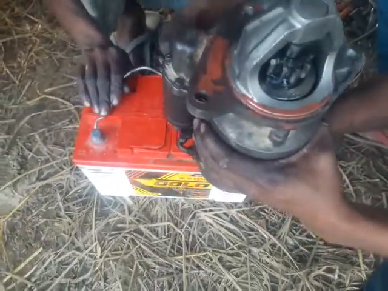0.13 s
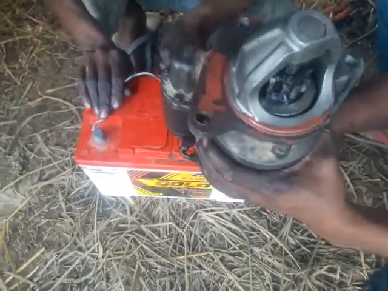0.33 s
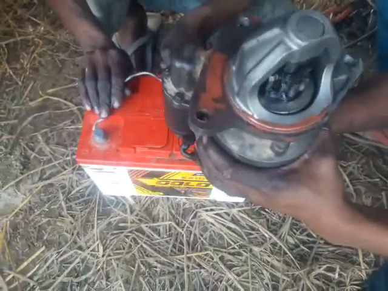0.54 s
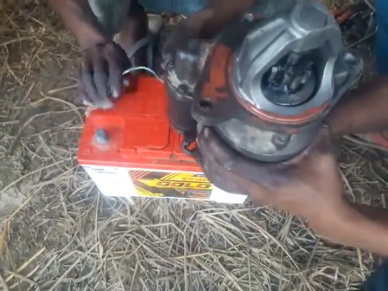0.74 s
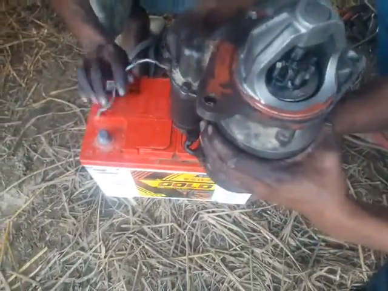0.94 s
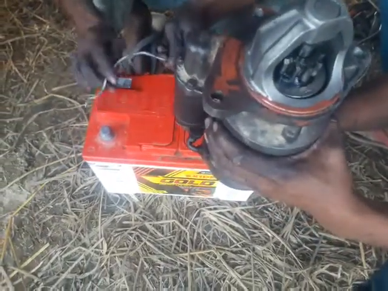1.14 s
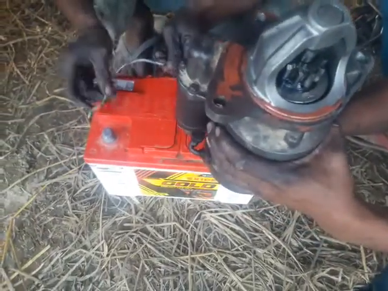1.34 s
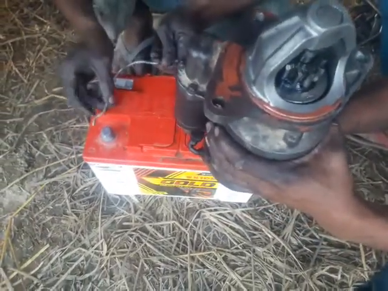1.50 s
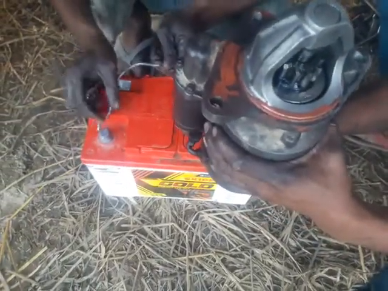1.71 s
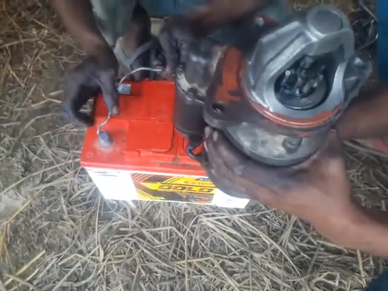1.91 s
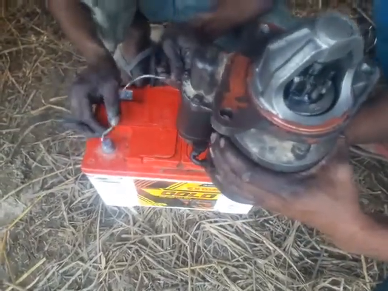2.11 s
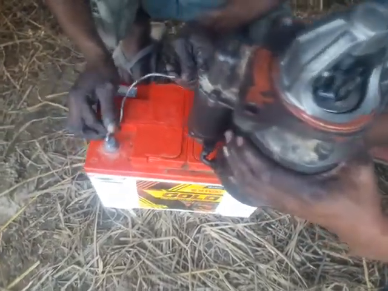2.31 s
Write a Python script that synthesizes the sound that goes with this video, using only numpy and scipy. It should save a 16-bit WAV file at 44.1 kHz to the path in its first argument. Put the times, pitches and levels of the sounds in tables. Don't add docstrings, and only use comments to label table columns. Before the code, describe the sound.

Starter motor solenoid clanks in with sharp electric spark snaps, then drops out in a quiet yard

```python
import sys
import numpy as np
from scipy import signal
from scipy.fft import rfft, irfft
from scipy.io import wavfile
from scipy.ndimage import uniform_filter1d

SR = 44100
rng = np.random.default_rng(int(sys.argv[2]) if len(sys.argv) > 2 else 0)


def to_linear_factor(level_db):
    exponent = np.asarray(level_db, float) / 20
    return 10 ** exponent


def waveform_to_disk(signal):
    frames = np.transpose(np.atleast_2d(signal))
    scaled = np.clip(frames, -1, 1) * 32767
    samples = np.round(scaled).astype(np.int16)
    wavfile.write(sys.argv[1], SR, samples)


N = 103635

# start_s [s], peak_db [dB], treble_db [dB], fizz_db [dB]
SPARKS = [
    (0.2858, -10, -16, -17),
    (0.2998, -16.5, -11, -14),
    (0.343, -6.5, -11, -14),
    (0.595, -21.5, -15.5, -15),
]
# pitch_hz [Hz], width_hz [Hz], level_db [dB]
SPARK_BODY = [(1800, 800, -9), (2350, 600, 0)]
# pitch_hz [Hz], width_hz [Hz], level_db [dB]
SPARK_EDGE = [(6600, 1400, 9.5), (11144, 2400, 8), (14000, 1300, 7.5)]
# pitch_hz [Hz], density_db [dB per Hz]
FIZZ = [(180, -41), (300, -22), (767, -12.5), (2210, 2.5), (4000, -13.5), (8020, -21), (14200, -5.5),
        (16500, -17.5)]
# pitch_hz [Hz], density_db [dB per Hz]
SECOND_ARC = [(9000, -22.5), (14500, 0), (16500, -8)]
# pitch_hz [Hz], density_db [dB per Hz]
SPARK_ECHO = [(700, -19.5), (2200, -0.5), (4000, -11.5), (8000, -18), (14000, -7.5), (16500, -17.5)]

# start_s [s], ring_db [dB], treble_db [dB], crack_db [dB], crack_t60_s [s]
PULL_IN = [
    (.2218, -36, -15, -45, 0.011),
    (.2231, -14.5, -8, -17, 0.025),
    (.227, -23, -3, -21, .05),
    (.2288, -36, 14, -25, .11),
]
# start_s [s], ring_db [dB], treble_db [dB], crack_db [dB], crack_t60_s [s]
DROP_OUT = [
    (.6135, -38, -30, -60, .03),
    (.6172, -36, -30, -55, .02),
    (0.6202, -21, 7, -21, 0.012),
    (.6215, -38, 6, -30, 0.04),
]
# pitch_hz [Hz], level_db [dB], t60_s [s]
CASE_MODES = [(400, -14, .03), (800, -8, .04), (1610, -9, .035), (2000, -12, .04), (2310, -8, .06),
              (3820, -13, .07), (4500, -19, .06), (5950, -21, .05), (7200, -16, .02), (9232, -14, .04),
              (11100, -11, .035), (13300, -11, .03)]
# pitch_hz [Hz], level_db [dB], t60_s [s]
PLUNGER_MODES = [(690, -11, .04), (1250, -12, .03), (1620, -10, .03), (1990, -13, .03), (2300, -13, .03),
                 (6550, -20, .01), (9300, -22, .03), (14900, -7, .012)]
# pitch_hz [Hz], level_db [dB], t60_s [s]
SPRING_MODES = [(1650, -2, .025), (2400, -12, .03), (6550, 0, .028), (9300, -18, .02), (14500, -10, .015)]
# pitch_hz [Hz], density_db [dB per Hz]
CRACK_IN = [(120, -45), (200, -18), (1420, -12), (2250, -1.5), (3310, -16), (7500, -20.5), (14000, -17),
            (16500, -29)]
# pitch_hz [Hz], density_db [dB per Hz]
CRACK_OUT = [(120, -33), (200, 17.5), (1500, -0.5), (4500, -0.5), (6680, 7), (8330, -11.5), (15300, 1.5),
             (16500, -4)]
HOUSING_HZ, SHELL_HZ = 528, 2191
# start_s [s], pitch_hz [Hz], level_db [dB], t60_s [s]
HUMS = [
    (.2231, HOUSING_HZ, -23, 0.17),
    (.2231, 1130, -15, 0.025),
    (.2231, SHELL_HZ, -22.5, 0.15),
    (.6165, HOUSING_HZ, -28.5, 0.093),
]

# start_s [s], peak_db [dB], pitch_hz [Hz], treble_db [dB]
TICKS = [(.402, -42.5, 1510, -35.5), (0.7082, -45, 2030, 2), (0.71, -45, 2240, -14),
         (0.7484, -53, 2000, -30), (0.7522, -45.5, 1860, -17), (0.7659, -43, 2200, -20),
         (0.79, -57, 1500, -30), (0.7942, -46, 1415, -26), (0.8062, -38.5, 1650, -11.5),
         (0.823, -42.5, 2010, -16), (0.8452, -52, 1510, -24), (0.86, -55, 2200, -9),
         (0.867, -49, 1560, -24), (0.8731, -48, 1570, -29), (0.8868, -53.5, 2390, -34.5),
         (0.9227, -55.5, 1635, -30), (0.936, -59.5, 2253, -37), (0.944, -50, 1592, -33),
         (1.502, -59.5, 2093, -18), (1.7995, -53.5, 1557, -21), (1.992, -63, 2300, -27),
         (2.0538, -59, 2650, -18), (2.0556, -55, 1500, -26), (2.287, -54.5, 1600, -32),
         (2.31, -52, 1650, -25)]
# pitch_hz [Hz], density_db [dB per Hz]
TICK_PUFF = [(2060, -46), (3500, -7.5), (8030, -4), (13400, -4), (16500, -9)]
# start_s [s], level_db [dB], pitch_hz [Hz], length_s [s]
THUDS = [(0.221, -53, 142, 0.015), (.224, -43.5, 280, 0.012), (.285, -50.5, 132, 0.016),
         (0.34, -52, 116, 0.02), (.37, -57.5, 199.5, 0.026), (0.484, -60.5, 194.7, 0.016),
         (0.593, -62, 170, 0.016), (0.614, -60.5, 85, 0.041), (.643, -50.5, 209, 0.017),
         (0.404, -77, 110, 0.028), (1.133, -71, 80, .03), (1.471, -73.5, 129.4, 0.033),
         (1.52, -74.5, 171, .03), (1.593, -68, 70.9, 0.025), (1.727, -71.5, 70, 0.041)]
# pitch_hz [Hz], gain_db [dB]
MICROPHONE = [(3000, -0.5), (4600, -3.5), (6500, -2.5), (8000, -3), (9200, -0.5)]
# pitch_hz [Hz], t60_s [s]
NEAR_GROUND = [(300, .09), (2000, .1), (10000, .085)]
# pitch_hz [Hz], t60_s [s]
FAR_WALLS = [(300, 0.15), (3000, 0.26), (6000, .2), (14000, .2)]

# pitch_hz [Hz], density_db [dB per Hz]
HAND = [(400, -18), (700, -15.5), (1650, 0.5), (3500, -9.5), (7900, -28), (10000, -19), (14500, -9),
        (16500, -13.5)]
# time_s [s], level_db [dB]
HAND_COURSE = [(1.399, -102), (1.55, -86.5), (2.2, -80.5), (2.26, -76), (2.302, -62), (2.35, -58)]
# pitch_hz [Hz], density_db [dB per Hz]
STRAW = [(24, -28.5), (45, -6.5), (58, -8.5), (151, -4.5), (2640, -13), (3450, -20), (8000, -44),
         (10400, -74.5), (17600, -120)]
# time_s [s], level_db [dB]
STIR_COURSE = [(0, -83.5), (.1, -82), (0.204, -73), (0.548, -72.5), (.72, -70), (.9, -77), (1.001, -77),
               (1.27, -82.5), (1.45, -81), (1.751, -75), (1.95, -70), (2.149, -68.5), (2.35, -69.5)]

# start_s [s], length_s [s], level_db [dB]
SWELLS = [(1.447, .019, -80), (1.465, .016, -71), (1.481, .008, -66), (1.491, .007, -62),
          (1.499, .013, -62), (1.517, .015, -56), (1.534, .011, -58), (1.543, .029, -53), (1.577, .01, -59),
          (1.592, .017, -53), (1.61, .014, -61), (1.63, .02, -65)]
# start_s [s], length_s [s], pitch_hz [Hz], bend_hz [Hz], level_db [dB]
NOTES = [
    (1.32, 0.022, 2640, -120, -69),
    (1.345, 0.03, 2520, 2, -65),
    (1.372, .035, 2510, 0, -76),
    (1.886, .022, 2700, -600, -71),
    (1.919, 0.022, 2950, -800, -58),
    (1.951, 0.023, 2950, -750, -54),
]
# start_s [s], length_s [s], pitch_hz [Hz], level_db [dB]
FAR_NOTES = [(.09, 0.064, 2660, -72.5), (0.125, 0.048, 2400, -66.5), (0.183, 0.068, 2705, -66),
             (0.508, 0.09, 2933, -72.5), (1.034, 0.037, 2599, -70.5), (1.062, 0.041, 2394, -69),
             (1.112, 0.031, 2743, -69), (1.121, 0.028, 2502, -69), (1.137, 0.051, 3200, -81),
             (1.973, 0.013, 2427, -70.5), (2.001, .03, 2357, -83)]
# pitch_hz [Hz], density_db [dB per Hz]
BREEZE = [(45, -33), (60, -1), (120, -0.5), (300, -38.5)]
# pitch_hz [Hz], density_db [dB per Hz]
AIR = [(12, -40.5), (40, -9), (670, -23), (939, -31), (3230, -32), (16500, -33)]


def evened(x):
    return x / np.sqrt(np.mean(x ** 2) + 1e-20)


def seconds(length_s):
    return np.arange(int(length_s * SR)) / SR


def add(mix, start_s, sound):
    part = mix[round(start_s * SR):][:len(sound)]
    part += sound[:len(part)]


def read(points, hz):
    f, value = np.transpose(points)
    return np.interp(np.log(hz + 1), np.log(f + 1), value)


def colour(x, points):
    hz = np.fft.rfftfreq(len(x), 1 / SR)
    inside = (hz > points[0][0]) & (hz < points[-1][0])
    return evened(irfft(rfft(x) * to_linear_factor(read(points, hz)) * inside, len(x)))


def wander(count, hz):
    size = int(SR / hz / 2)
    once = uniform_filter1d(rng.standard_normal(count), size)
    return evened(uniform_filter1d(once, size))


def burst(points, t60_s):
    t = seconds(.2)
    return colour(rng.standard_normal(len(t)), points) * to_linear_factor(-60 * t / t60_s)


def ring(hz, db, t60_s):
    t = seconds(.3)
    return to_linear_factor(db - 60 * t / t60_s) * np.sin(2 * np.pi * hz * t)


def tail(t60_of, start_s):
    spacing = 20
    taps = np.zeros(SR)
    at = np.arange(int(start_s * SR), SR - spacing, spacing)
    taps[at + rng.integers(0, spacing, len(at))] = rng.choice([-1., 1.], len(at))
    hz, t, z = signal.stft(taps, SR, nperseg=128)
    dying = to_linear_factor(-60 * t / read(t60_of, hz)[:, None])
    out = signal.istft(z * dying, SR, nperseg=128)[1]
    return out / np.linalg.norm(out)


def motor():
    out = np.zeros(N)
    for start_s, *row in SPARKS:
        add(out, start_s, spark(*row))
    for start_s, *row in PULL_IN:
        add(out, start_s, blow(CASE_MODES, CRACK_IN, *row))
    for start_s, *row in HUMS:
        add(out, start_s, hum(*row))
    for start_s, *row in DROP_OUT:
        add(out, start_s, blow(PLUNGER_MODES, CRACK_OUT, *row))
    bounce = blow(SPRING_MODES, CRACK_OUT, ring_db=-30, treble_db=0, crack_db=-36, t60_s=.021)
    add(out, .646, bounce)
    for start_s, *row in TICKS:
        add(out, start_s, tick(*row))
    low_cut_hz = 577
    out = signal.lfilter(*signal.butter(2, low_cut_hz, "high", fs=SR), out)
    out = irfft(rfft(out) * to_linear_factor(read(MICROPHONE, np.fft.rfftfreq(N, 1 / SR))), N)
    answer = to_linear_factor(-13) * tail(NEAR_GROUND, .003) + to_linear_factor(-33.5) * tail(FAR_WALLS, .047)
    return out + signal.fftconvolve(out, answer)[:N]


def spark(db, treble_db, fizz_db):
    rise_s = .000084
    body = sum(ring(hz, level_db, np.log(9) / width_hz) for hz, width_hz, level_db in SPARK_BODY)
    body = body * (1 - np.exp(-np.arange(len(body)) / SR / rise_s))
    edge = sum(ring(hz, level_db, np.log(9) / width_hz) for hz, width_hz, level_db in SPARK_EDGE)
    out = body / abs(body).max() + to_linear_factor(treble_db) * edge
    add(out, .0008, to_linear_factor(fizz_db) * burst(FIZZ, t60_s=.016))
    add(out, .00078, to_linear_factor(treble_db - 3.5) * burst(SECOND_ARC, t60_s=.006))
    add(out, .0105, to_linear_factor(-28) * burst(SPARK_ECHO, t60_s=.05))
    return to_linear_factor(db) * out


def blow(modes, crack, ring_db, treble_db, crack_db, t60_s):
    rattle, rattle_hz, treble_from_hz, rise_s = .7, 143, 5000, .00045
    out = 0
    for hz, level_db, mode_t60_s in modes:
        mode = ring(hz, ring_db + level_db + treble_db * (hz > treble_from_hz), mode_t60_s)
        loose = np.clip(rattle * np.log(hz / 500) / 2, 0, 1)
        shake = 1 - loose + loose * wander(len(mode), rattle_hz)
        sign = rng.choice([-1, 1]) if loose > .1 else 1
        out = out + mode * shake * sign
    add(out, 0, to_linear_factor(crack_db) * burst(crack, t60_s))
    return out * np.minimum(np.arange(len(out)) / SR / rise_s, 1)


def hum(hz, db, t60_s):
    rise_s = .001
    return ring(hz, db, t60_s) * (1 - np.exp(-seconds(.3) / rise_s))


def tick(db, hz, treble_db):
    width_hz, t60_s, rise_s = 1100, .013, .00062
    t = seconds(.2)
    band = [(hz / 3, -14), (hz, 0), (hz + width_hz, -3), (hz + 2 * width_hz, -20)]
    body = ring(hz, 0, t60_s)[:len(t)] + .35 * burst(band, t60_s * 2.27)
    body = body * np.minimum(t / rise_s, 1)
    puff = to_linear_factor(treble_db - 7.5) * burst(TICK_PUFF, t60_s=.034)
    return to_linear_factor(db) * (body / abs(body).max() + puff)


def thuds():
    out = np.zeros(N)
    for start_s, db, hz, length_s in THUDS:
        t = seconds(length_s)
        push = np.sin(np.pi * np.sqrt(t / length_s)) ** 2
        add(out, start_s, to_linear_factor(db) * push * np.sin(2 * np.pi * hz * t))
    return out


def hand():
    return rustle(HAND, HAND_COURSE, -1.5)


def straw():
    return rustle(STRAW, STIR_COURSE, 0)


def rustle(points, course, db):
    grains_per_s, spread_db, bed = 2500, 2.5, 1.3
    size = to_linear_factor(spread_db * np.minimum(rng.exponential(1, N), 3.6))
    size = size * (rng.random(N) < grains_per_s / SR)
    grains = evened(size * rng.choice([-1., 1.], N)) + bed * rng.standard_normal(N)
    time_s, level_db = np.transpose(course)
    level_db = np.interp(np.arange(N) / SR, time_s, level_db, left=-120)
    return colour(grains, points) * to_linear_factor(db + level_db)


def birds():
    blur_hz = 260
    near, far = np.zeros(N), np.zeros(N)
    add(near, 1.445, falling_whistle(1.445))
    for start_s, *row in NOTES:
        add(near, start_s, note(*row))
    for start_s, length_s, hz, db in FAR_NOTES:
        add(far, start_s, note(length_s, hz, 0, db))
    out = near * to_linear_factor(1.5 * wander(N, blur_hz)) + far * wander(N, blur_hz)
    hedge = tail([(100, .14), (9000, .14)], .003)
    far_yard = tail([(100, .7), (9000, .7)], .02)
    answer = to_linear_factor(-10) * hedge + to_linear_factor(-10.5) * far_yard
    return out + signal.fftconvolve(out * wander(N, blur_hz), answer)[:N]


def falling_whistle(start_s):
    top_hz, end_hz, hold_s, fall_s = 4350, 2450, .015, .042
    t = seconds(.22)
    level = np.zeros(len(t))
    hz = end_hz + (top_hz - end_hz) * np.exp(-np.maximum(t - hold_s, 0) / fall_s)
    for swell_s, length_s, db in SWELLS:
        arch = np.sin(np.pi * seconds(length_s) / length_s)
        add(level, swell_s - start_s, to_linear_factor(db) * arch ** .68)
    flutter = to_linear_factor(1.5 * wander(len(t), 150))
    return level * flutter * np.sin(2 * np.pi * np.cumsum(hz) / SR)


def note(length_s, hz, bend_hz, db):
    arch = np.sin(np.pi * seconds(length_s) / length_s)
    phase = 2 * np.pi * np.cumsum(hz + bend_hz * arch) / SR
    return to_linear_factor(db + 1.5) * arch ** .4 * np.sin(phase)


def breeze():
    gust_db = 3.5 * wander(N, 9.9)
    return to_linear_factor(-91 + gust_db) * colour(rng.standard_normal(N), BREEZE)


def still_air():
    return to_linear_factor(-87.5) * colour(rng.standard_normal(N), AIR)


def scene():
    air = still_air()
    return (motor() + thuds() + breeze() + birds() + air + straw() + hand())[None]


def top_cut(x):
    return signal.sosfilt(signal.butter(12, 17040, fs=SR, output="sos"), x)


def record(dry):
    edge_hz, offset_db = 16250, -70.5
    low_pass = signal.firwin(255, edge_hz, window=("kaiser", 9), fs=SR)
    mix = signal.oaconvolve(dry, low_pass[None], "same") - to_linear_factor(offset_db)
    return top_cut(mix)


dry = scene()
out = record(dry)
waveform_to_disk(out)
```